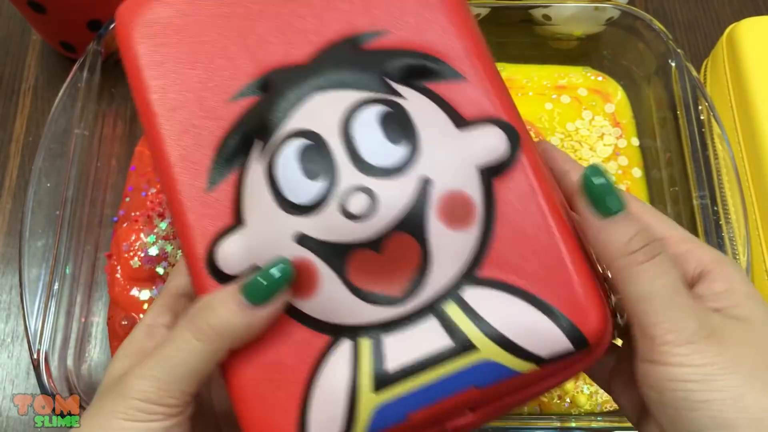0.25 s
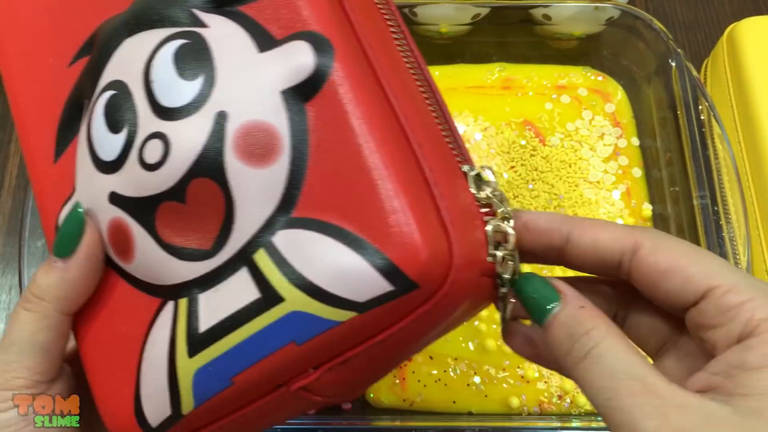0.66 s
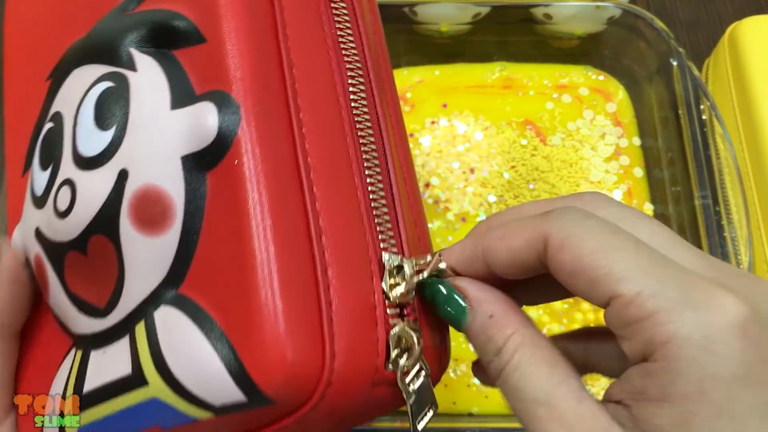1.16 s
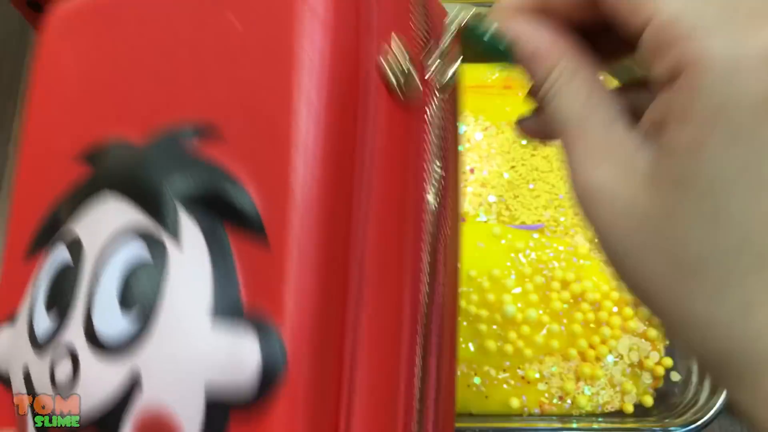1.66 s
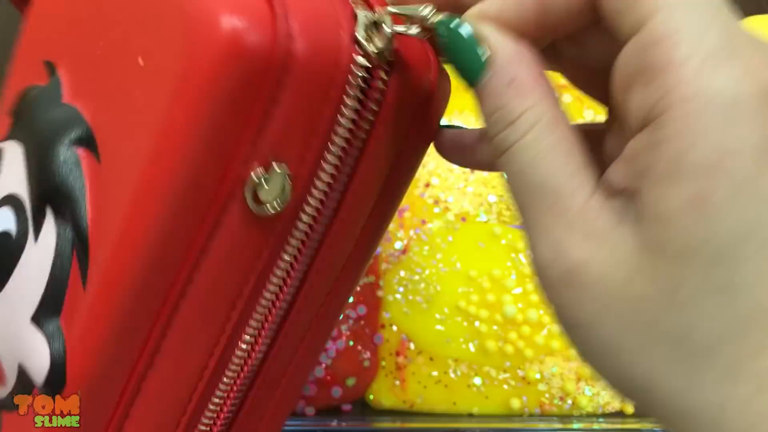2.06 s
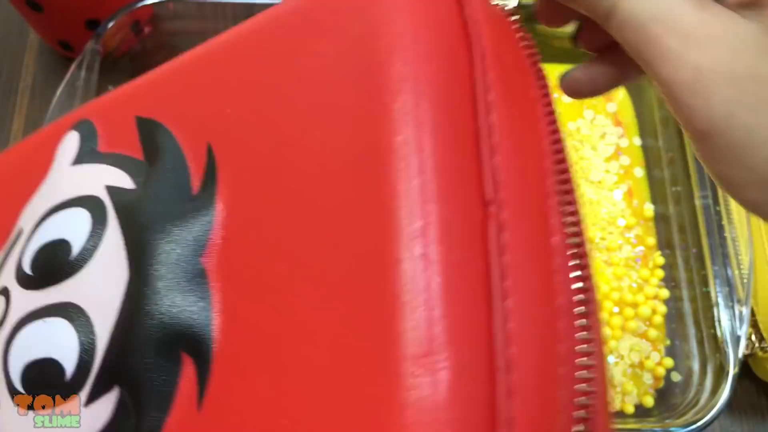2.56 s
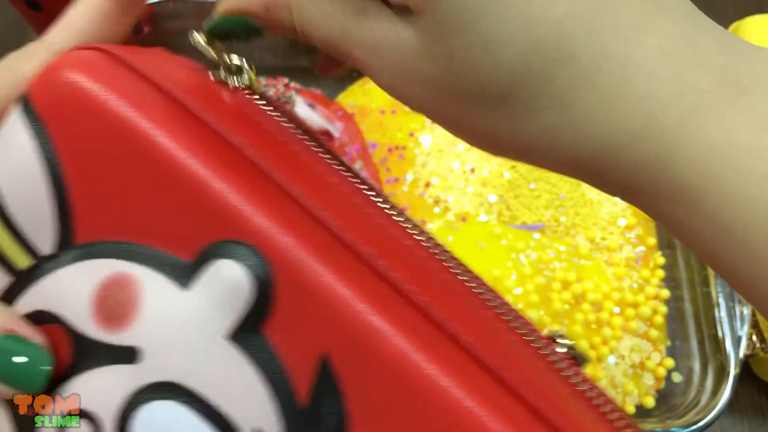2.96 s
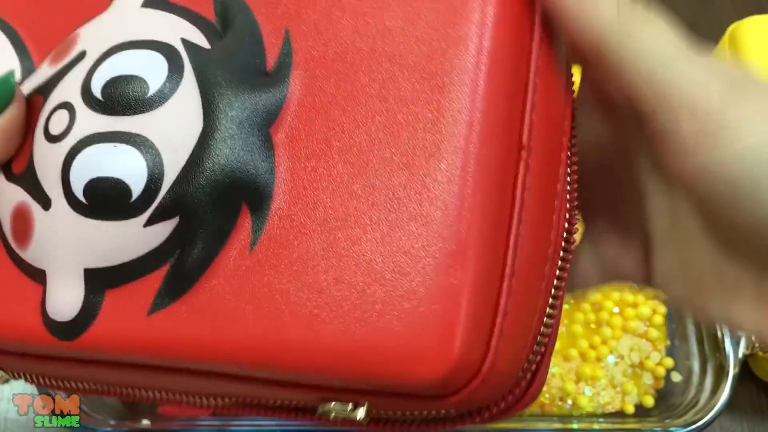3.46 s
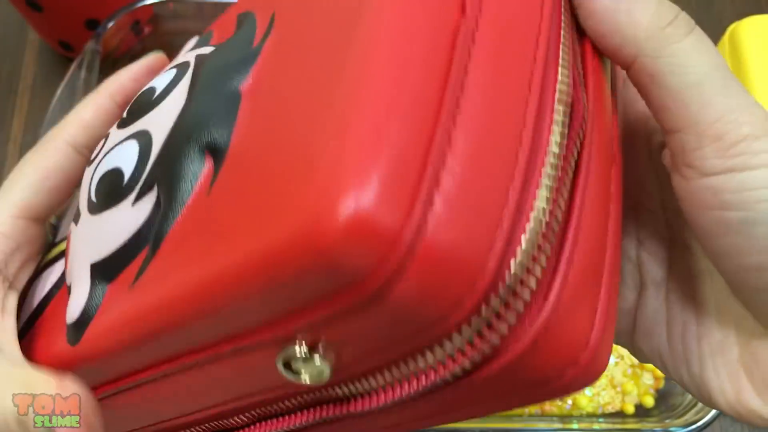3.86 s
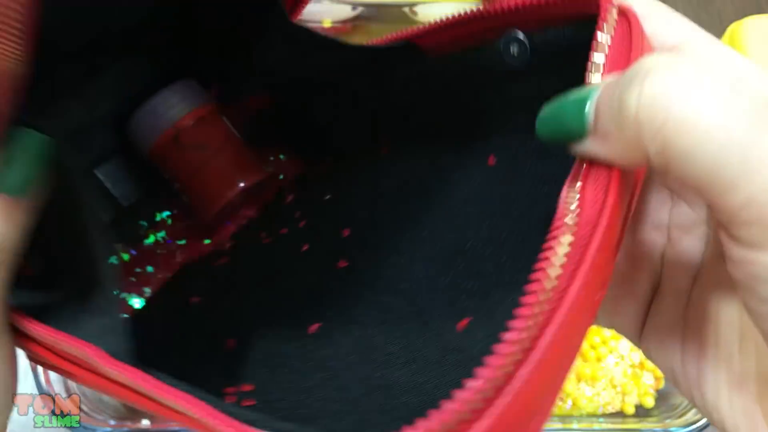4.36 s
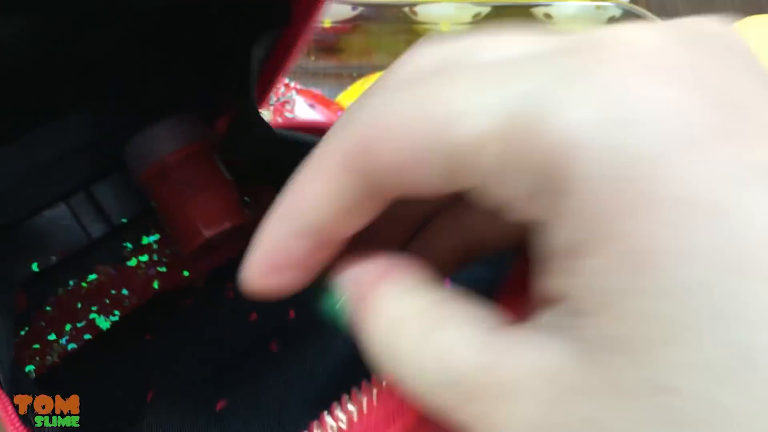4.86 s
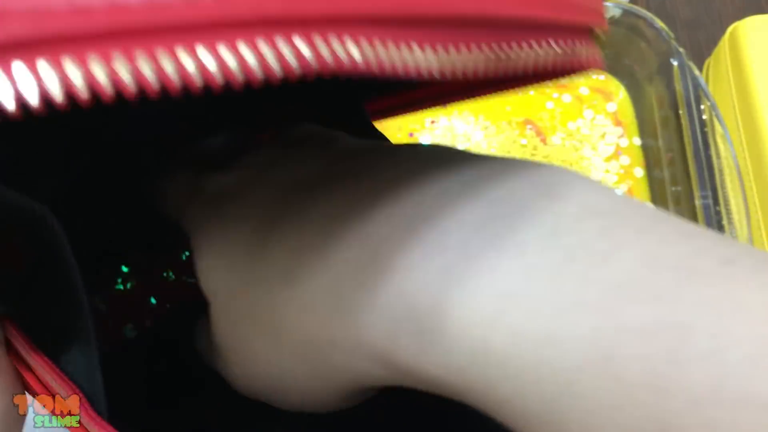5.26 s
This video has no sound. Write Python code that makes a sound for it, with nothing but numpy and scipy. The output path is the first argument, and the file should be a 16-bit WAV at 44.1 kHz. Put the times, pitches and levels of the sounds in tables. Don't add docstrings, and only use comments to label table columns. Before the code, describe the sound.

Metal zip pulls jingle on a stiff case, the zip is drawn open in quick buzzing runs, then the lid pops and fingers rub inside.

```python
import sys
import numpy as np
from scipy import signal
from scipy.io import wavfile
from scipy.ndimage import uniform_filter1d

SR = 44100
rng = np.random.default_rng(int(sys.argv[2]) if len(sys.argv) > 2 else 0)


def volts_from_decibels(level):
    exponent = np.asarray(level, float) / 20
    return 10 ** exponent


def transcribe(u):
    v = np.clip(np.atleast_2d(u).T, -1, 1)
    q = np.round(v * 32767).astype(np.int16)
    wavfile.write(sys.argv[1], SR, q)


N = 243431

# frequency in Hz, level in dB per Hz.
ROOM_COLOUR = [(15, -41), (25, -10), (107, 2), (253, -12.5), (331, -7.5), (782, -23.5), (2360, -23),
               (2920, -32.5), (3440, -27), (15500, -33.5)]
ROOM_DB = -59.5

# start in seconds, length in seconds, pressure in dB,
# slide against pressure in dB.
STROKES = [(0.225, 0.075, -65.5, -21), (0.448, 0.15, -60, -4), (0.647, 0.078, -57.5, -8.5),
           (0.87, 0.22, -59, -9), (1.213, 0.062, -53.5, -10.5), (1.333, 0.19, -54, -6.5),
           (1.561, 0.13, -54, -18), (1.703, 0.2, -51.5, -11.5), (2.024, 0.082, -41.5, -13.5),
           (2.118, 0.15, -46.5, -10), (2.374, 0.053, -47.5, -5.5), (2.524, 0.068, -44.5, -13),
           (2.884, 0.15, -40, -15.5), (3.298, 0.11, -45, -7.5), (3.38, 0.061, -41.5, -10),
           (3.502, 0.11, -56.5, -4), (3.643, 0.15, -48, -5), (3.744, 0.11, -47, -6.5),
           (3.886, 0.13, -49.5, -0.5), (3.979, 0.13, -45, -4), (4.045, .16, -44, -10),
           (4.207, 0.38, -56.5, -5), (4.406, 0.069, -45, -4.5), (4.542, 0.095, -52.5, 1.5),
           (4.632, 0.13, -55, 4), (4.75, 0.052, -57, 1), (4.806, 0.055, -60, 4.5),
           (4.95, 0.079, -59.5, 2.5), (5.036, 0.032, -53, -7.5), (5.14, 0.18, -53.5, 4.5),
           (5.268, 0.17, -48.5, 2.5)]
TOUCH_S, LET_GO_DB_PER_S, REST_DB = 0.026, 225, -78
LINGER_DB, LINGER_DB_PER_S = -7, 25
CREAK_SHUT_DB, CREAK_OPEN_DB, CREAK_FOLLOWS_SLIDE = -1.5, -1, 0.4
RUMBLE_DB, RUMBLE_FOLLOWS, ARM_S = -35.5, 0.43, 0.044
# frequency in Hz, level in dB per Hz.
SHUT_COLOUR = [(88, -33), (150, -11.5), (339, -3), (710, -13.5), (1300, -19.5), (2990, -30), (11400, -38),
               (13400, -33), (15600, -44)]
# frequency in Hz, level in dB per Hz.
OPEN_COLOUR = [(88, -30), (150, 7.5), (398, 4.5), (689, 1), (1100, -2.5), (1390, -25), (3220, -13),
               (14200, -15.5), (16000, -23)]
OPENS_AT_S, AIR_DB = 3.55, -1
# frequency in Hz, width in Hz, level in dB.
HOLLOW_MODES = [(700, 200, -1), (1490, 300, 1), (2300, 400, -5)]
# frequency in Hz, width in Hz, level in dB.
REACHED_MODES = [(170, 74, -3), (698, 51, 1.5), (1460, 170, 3.5), (2540, 950, 0.5)]
REACH_S = 5.03
REACH_DB, REACH_DAMPS_DB = 8.0, -1.5
# frequency in Hz, width in Hz, level in dB.
HAND_GAP_MODES = [(2750, 1000, 0)]
HAND_GAP_DB = -20

# start in seconds, end in seconds, level in dB.
FOLD_CREAKS = [
    (3.77, 3.888, -48),
    (3.906, 3.95, -43),
    (4.444, 4.495, -42.5),
    (4.622, 4.79, -49.5),
]
# frequency in Hz, width in Hz, level in dB.
FOLD_MODES = [(1380, 260, 0), (2230, 120, 0), (3960, 540, -16)]

# time in seconds, peak in dB, frequency in Hz.
BUMPS = [(.581, -43, 380), (.67, -42.5, 546), (.7006, -38, 460), (.902, -40, 466), (.93, -36.5, 345),
         (.979, -40, 444), (1.014, -42, 445), (1.066, -40.5, 326), (1.1926, -33, 398), (1.262, -37, 373),
         (1.407, -34, 466), (1.454, -38.5, 328), (1.591, -36, 506), (1.625, -36.5, 505), (2.164, -33, 324),
         (2.189, -25, 380), (2.233, -36.5, 180), (2.269, -42.5, 380), (2.347, -28.5, 413),
         (2.404, -32.5, 435), (2.422, -30.5, 357), (2.521, -36, 370), (2.6, -31, 437), (2.86, -24, 506),
         (2.925, -28, 446), (3.102, -27.5, 520), (3.413, -30, 363), (3.5715, -40, 425.4), (2.701, -34, 390),
         (2.715, -25.5, 390), (2.04, -18.5, 487), (2.052, -21.5, 366)]
# time in seconds, peak in dB, frequency in Hz.
LID_POP = [(4.047, -37, 473), (4.0832, -8.5, 575), (4.086, -16.5, 345), (4.098, -24.5, 195),
           (4.109, -27, 204), (4.113, -18.5, 540), (4.131, -30, 680), (4.142, -34, 625), (4.15, -29.5, 322),
           (4.158, -38, 623), (4.165, -28, 306), (4.1785, -21.5, 515), (4.19, -38, 670), (4.203, -35, 307),
           (4.218, -38, 620), (4.225, -40.5, 342), (4.24, -44, 624), (4.258, -38, 340)]
# time in seconds, peak in dB.
RIM_TAPS = [(0.568, -36.5), (0.727, -40), (0.964, -32.5), (1.223, -44), (1.568, -42), (2.216, -32),
            (3.07, -30.5), (3.782, -25), (3.811, -28.5), (3.829, -28), (3.852, -39), (3.869, -26),
            (3.908, -31), (3.937, -29.5), (4.738, -30.5), (4.768, -31.5), (5.447, -38), (3.77, -32),
            (4.046, -30.5), (4.086, -33), (4.096, -27), (4.1125, -22.5), (4.1813, -31.5), (4.294, -41),
            (5.114, -40), (5.168, -36), (5.241, -46), (5.261, -36), (5.29, -35), (5.332, -28), (5.379, -34),
            (5.51, -34)]
# time in seconds, peak in dB.
GAPE_BUMPS = [(2.634, -35), (3.395, -34), (3.6361, -20), (3.659, -36), (3.696, -21), (3.706, -25.5),
              (3.964, -31.5), (4.447, -33), (4.459, -33), (4.478, -31.5), (4.4971, -32), (4.533, -35),
              (4.633, -36.5), (4.647, -30), (4.714, -33.5), (5.02, -27.5), (5.206, -37.5), (5.31, -34),
              (5.511, -33.5)]
RIM_HZ, GAPE_HZ = 1318, 649
# time in seconds, peak in dB, frequency in Hz.
JOLTS = [(2.59, -38, 155), (2.851, -26.5, 185), (2.245, -38.5, 87.5), (2.811, -37, 104.1), (3.001, -45, 70),
         (4.4, -47, 70), (5.286, -36, 170), (5.431, -42, 60)]

# time in seconds, tick peak in dB, knock peak in dB.
SMALL_PULL = [(.5664, -32.5, -36), (.7, -35.5, -41.5), (.7227, -26.5, -42), (.899, -32.5, -38),
              (.9287, -26.5, -32), (1.2256, -35, -42), (1.248, -25.5, -31.5), (1.268, -32, -38),
              (1.362, -29, -39.5), (1.4042, -30, -25.5), (1.735, -28.5, -48), (2.16, -34, -32.5),
              (2.526, -36, -43), (2.5425, -41, -53), (2.56, -23, -32), (2.567, -27, -28.5),
              (2.5824, -40.5, -33), (2.6027, -19, -23.5), (2.903, -34.5, -43), (3.78, -37, -25),
              (3.85, -40, -28), (4.092, -26.5, -27), (4.4674, -31, -46), (4.4765, -22.5, -33),
              (4.532, -28, -25.5), (4.635, -34, -40), (4.771, -37, -35), (5.1776, -33, -30),
              (5.423, -43, -39), (5.45, -47, -30), (.574, -40, -38), (.668, -51, -45), (.905, -50, -54),
              (.95, -46, -66), (2.554, -42, -32), (3.611, -36, -37)]
# time in seconds, tick peak in dB, knock peak in dB.
LARGE_PULL = [(.307, -48, -46.5), (.964, -43, -31), (1.021, -44, -45), (1.1936, -24, -33), (1.23, -37, -40),
              (1.397, -26, -53.5), (1.4465, -21.5, -29), (1.4522, -25, -26), (1.49, -33, -56),
              (1.507, -34, -35), (1.566, -37, -36), (2.2148, -24, -39), (2.2308, -26.5, -25),
              (2.407, -39, -31), (3.067, -37, -32), (3.396, -30, -25), (3.4037, -33, -34),
              (3.443, -44, -34), (3.626, -41, -34), (3.6363, -16, -15.5), (3.659, -28, -30),
              (3.6707, -21.5, -23), (3.678, -27, -29), (3.7056, -20, -20), (3.911, -36, -41),
              (3.966, -34, -31.5), (4.672, -41, -30), (5.02, -40, -29.5), (1.393, -35, -46),
              (2.513, -51, -43), (2.594, -34, -28.5), (3.696, -40, -39)]
# time in seconds, tick peak in
# dB, knock peak in dB.
NAILS = [(.976, -34, -34), (1.008, -35, -56), (1.588, -29, -29.5), (1.623, -28, -30.5), (1.787, -37, -44),
         (2.598, -40, -33), (3.1016, -53, -26.5), (3.572, -40, -33), (3.81, -33, -31.5),
         (3.816, -43, -24.5), (3.831, -43, -34), (3.868, -36, -30), (3.946, -33.5, -35), (4.0777, -30, -24),
         (4.0835, -40.5, -22), (4.113, -44, -23), (4.164, -36, -32), (4.179, -49, -31.5),
         (4.4456, -44, -41), (4.495, -51, -29.5), (4.736, -51, -24.5), (4.779, -47.5, -29.5),
         (4.867, -46, -33), (5.026, -38.5, -35), (2.788, -31, -22), (2.796, -41, -24), (2.826, -24, -14),
         (2.831, -40, -22), (3.999, -44, -51), (4.027, -47, -48), (4.146, -37, -44), (4.455, -44, -38),
         (4.487, -48, -42), (4.714, -48, -36), (4.846, -50, -37), (5.148, -56, -35), (2.588, -49, -38),
         (3.803, -46, -30), (3.878, -42, -35), (3.927, -51, -37), (4.01, -48, -55)]
SMALL_HZ, LARGE_HZ, NAIL_HZ = 13200, 10200, 6100
HZ_SPREAD = 0.03
BOUNCE_S, BOUNCE_DB = 0.005, -14

# time in seconds, level in dB, frequency in Hz,
# time to fall 60 dB in seconds.
PULL_RINGS = [(.942, -41, 10430, 0.036), (1.229, -33, 10400, 0.015), (2.602, -24.5, 9530, 0.0092),
              (3.638, -29, 10600, 0.025), (3.639, -48, 9400, .2), (3.639, -49, 13800, .1),
              (3.708, -52, 10600, .12), (3.708, -48, 13300, .12), (3.706, -29.5, 9450, 0.055),
              (3.706, -49, 9450, .6), (.929, -46, 10300, .03), (1.1936, -21, 14000, 0.0091),
              (1.361, -32.5, 9900, 0.013), (1.446, -37, 12800, .012), (1.4522, -33, 12800, .012),
              (2.56, -27, 13500, 0.011), (2.567, -26, 14200, .008), (2.602, -12, 13530, 0.008),
              (2.603, -33, 12200, 0.01), (3.678, -24, 11700, .009), (3.7056, -26, 13800, .012)]
BEAT_HZ, BEAT_DEPTH = 37.8, 0.29
# time in seconds, peak in dB.
SHIMMERS = [
    (2.603, -47),
    (3.706, -36),
]
SHIMMER_T60_S = 0.35

# time in seconds, teeth per second, pull force in dB,
# how firmly the slider bears on the wall in dB, answer of the panel at twice the tooth rate in dB.
RUNS = [
    [(1.8, 66, -52.5, -6, -14), (1.84, 148, -37.5, 0, -18), (1.876, 200, -33, 3.5, 8.5),
     (1.92, 231, -28.5, 2.5, -6), (1.945, 282, -26.5, 8, -1.5), (1.97, 322, -27.5, 14, -24),
     (2.003, 332, -24, -21, -22), (2.036, 350, -33, 2, -9), (2.07, 281, -46, 2, 0)],
    [(2.7, 62, -44.5, -13, -9), (2.732, 126, -38.5, 7, -3), (2.747, 190, -34.5, 9.5, -4),
     (2.76, 324, -35, 10, 2), (2.79, 390, -25, -1, -11), (2.812, 490, -27.5, 5.5, -23),
     (2.832, 570, -27, -0.5, -20), (2.87, 490, -53, 11, -10)],
    [(2.925, 100, -51, -15, -5), (2.965, 125, -40.5, -12, 2), (3.0, 206, -48.5, 20, 0),
     (3.03, 182.5, -66, 20, 0)],
    [(3.1, 170, -47, 7, -1), (3.14, 200, -39, 9, 0), (3.155, 213, -36, 12.5, 7),
     (3.186, 285, -32, 3.5, 3.5), (3.215, 305, -25.5, 1, -19), (3.24, 317, -25, -7, 7.5),
     (3.262, 288, -25.5, -14, -7), (3.292, 215, -30, -4, 0.5), (3.33, 197, -45.5, -2, -1)],
]
# frequency in Hz, level in dB per Hz.
ZIP_COLOUR = [(380, -34), (650, 0), (784, -15), (1290, -13), (2500, -16), (3100, -31.5), (3700, -14.5),
              (6180, -22), (16000, -30)]
# frequency in Hz, width in Hz, level in dB.
WALL_MODES = [
    [(1052, 44, -2), (1276, 54, 3), (1763, 52, -3.5), (2100, 590, 3)],
    [(950, 90, 1), (1410, 140, 7.5), (1880, 191, -5), (2344, 190, 6.5)],
    [(900, 220, -9), (1260, 110, 4), (1810, 200, -7), (2240, 690, 5)],
    [(847, 150, 4), (1295, 100, 6.5), (1777, 60, -1), (2330, 1200, 0.5)],
]
# frequency in Hz, width in Hz, level in dB.
SLIDER_MODES = [
    [(3590, 240, -3.5), (4550, 220, -3), (5050, 200, -20), (6620, 360, 7), (7800, 3200, 3)],
    [(3530, 360, -4.5), (4300, 450, 5), (4840, 500, -29), (6450, 680, -5), (8000, 3500, 1)],
    [(3640, 640, -5), (4700, 300, 1), (5160, 600, -17), (6100, 610, 10), (7950, 6600, 2)],
    [(3830, 320, 2), (4050, 230, 3), (5020, 57, 0), (6400, 310, 7), (7900, 8400, -4)],
]
# frequency in Hz, width in Hz, level in dB.
BOX_MODES = [(380, 86, -1), (537, 170, -3.5)]
BOX_FADES_DB_PER_S = 6.5
SIZZLE_DB, SIZZLE_GROWS, FULL_FORCE_DB = -3, 0.23, -22.5
RUN_KNOCK_DB = [0.11, 0.36, 0.1, 2.7]
RUN_SIZZLE_DB = [-0.98, -1.5, -1.2, -1.16]
OTHER_ROW_DB = [-1.5, -2.0, -3.0, -2.0]
OTHER_ROW_LAG, TOOTH_SCATTER = 0.46, 0.09
SKIPS_DB_PER_OCT = 16
BRISK_PER_S = 200


def rms_one(x):
    return x / np.sqrt(np.mean(x ** 2) + 1e-20)


def peak_one(x):
    return x / np.max(np.abs(x))


def band(x, low_hz, high_hz):
    return signal.sosfilt(signal.butter(2, [low_hz, high_hz], "band", fs=SR, output="sos"), x)


def drift(rate_hz):
    r = np.exp(-80 * np.pi * rate_hz / SR)
    chance = rng.standard_normal(N // 40 + 2002)
    slow = rms_one(signal.lfilter([1], [1, -2 * r, r * r], chance)[2000:])
    return np.interp(np.arange(N) / 40, np.arange(len(slow)), slow)


def coloured(x, spectrum, low_hz, high_hz, patchy_db):
    hz, db = np.transpose(spectrum)
    edges = np.geomspace(low_hz, high_hz, 2 + int(3 * np.log2(high_hz / low_hz)))
    middles = np.log(edges[1:] * edges[:-1]) / 2
    levels = np.interp(middles, np.log(hz), db)
    out = 0
    for k, (low, high, level) in enumerate(zip(edges, edges[1:], levels)):
        flicker = volts_from_decibels(level + patchy_db * drift(22.0))
        out = out + (-1) ** k * flicker * band(x, low, high)
    return rms_one(out)


def resonate(x, modes):
    out = 0
    for k, (hz, width_hz, db) in enumerate(modes):
        r = np.exp(-np.pi * width_hz / SR)
        poles = [1, -2 * r * np.cos(2 * np.pi * hz / SR), r * r]
        out = out + (-1) ** k * volts_from_decibels(db) * rms_one(signal.lfilter([1, 0, -1], poles, x))
    return rms_one(out)


def grains(per_s, spread_db):
    sizes = volts_from_decibels(spread_db * np.minimum(rng.exponential(1, N), 5)) * rng.choice([-1, 1], N)
    return rms_one(sizes * (rng.random(N) < per_s / SR))


def dying(t, rise_s, t60):
    return volts_from_decibels(-60 * t / t60) * (1 - np.exp(-t / rise_s))


def add(out, s, sound):
    at = round(s * SR)
    out[at:at + len(sound)] += sound[:N - at]


def in_time(tables, fade_s):
    t = np.arange(N) / SR
    s, *columns = np.transpose(np.vstack(tables))
    gate = 0
    for rows in tables:
        start, end = rows[0][0], rows[-1][0]
        gate = gate + np.interp(t, [start - fade_s, start, end, end + fade_s], [0, 1, 1, 0])
    return [np.minimum(gate, 1)] + [np.interp(t, s, c) for c in columns]


def per_run(values):
    starts = [run[0][0] - 0.02 for run in RUNS[1:]]
    return np.choose(np.searchsorted(starts, np.arange(N) / SR), values)


def room_air():
    return volts_from_decibels(ROOM_DB) * coloured(rng.standard_normal(N), ROOM_COLOUR, 36, 17500, patchy_db=1.2)


def room_tail(x, t60, wet_db):
    t = np.arange(12000) / SR
    echo = band(rng.standard_normal(len(t)), 140, 11400) * volts_from_decibels(-60 * t / t60) * (t > 0.003)
    return volts_from_decibels(wet_db) * signal.fftconvolve(x, echo / np.sqrt(np.sum(echo ** 2)))[:N]


def steady_top(x):
    return signal.sosfilt(signal.ellip(10, 0.5, 60, 15850, fs=SR, output="sos"), x)


def stroke_levels(opened):
    t = np.arange(N) / SR
    press = slide = volts_from_decibels(REST_DB)
    for s, length_s, db, slide_db in STROKES:
        after = np.maximum(t - s - length_s, 0)
        fall_db = np.minimum(LET_GO_DB_PER_S * after, LINGER_DB_PER_S * after - LINGER_DB)
        shape = np.clip((t - s) / TOUCH_S, 0, 1) * volts_from_decibels(db - fall_db)
        press = np.maximum(press, shape)
        slide = np.maximum(slide, shape * volts_from_decibels(slide_db))
    wall_db, hiss_db = 20 * np.log10(press), 20 * np.log10(slide)
    creak_db = wall_db + CREAK_FOLLOWS_SLIDE * (hiss_db - wall_db)
    creak_db = creak_db + (1 - opened) * CREAK_SHUT_DB + opened * CREAK_OPEN_DB
    gate, per_s, force_db, *_ = in_time(RUNS, fade_s=0.01)
    pull_db = np.where(gate > 0, force_db - 32.0, REST_DB)
    effort_db = uniform_filter1d(np.maximum(wall_db, pull_db), int(ARM_S * SR))
    return RUMBLE_DB + RUMBLE_FOLLOWS * effort_db, wall_db, creak_db, hiss_db


def hands():
    hiss = rng.standard_normal(N) + 0.36 * grains(900, spread_db=3.0)
    crackle = grains(420 * volts_from_decibels(5.0 * drift(12)), spread_db=3.2)
    opened = np.clip((np.arange(N) / SR - OPENS_AT_S) / 0.043, 0, 1)
    rumble_db, wall_db, creak_db, hiss_db = stroke_levels(opened)
    reached = np.arange(N) > REACH_S * SR

    rubbing = hiss + (0.68 - 0.34 * reached) * crackle
    with_hand, without_hand = (resonate(resonate(rubbing, m), m) for m in (REACHED_MODES, HOLLOW_MODES))
    air = np.where(reached, with_hand, without_hand)
    air = air + reached * volts_from_decibels(HAND_GAP_DB) * resonate(hiss + 0.44 * crackle, HAND_GAP_MODES)

    shake = band(band(rng.standard_normal(N), 32, 133), 34, 440)
    rumble = volts_from_decibels(rumble_db) * rms_one(shake * volts_from_decibels(1.5 * drift(9.7)))

    shaped = volts_from_decibels(creak_db + AIR_DB + REACH_DB * reached) * opened * air
    damped = 0.83 * volts_from_decibels(REACH_DAMPS_DB * reached)
    # level, band edges in Hz, flicker in dB, share of crackle, share left when open
    parts = [(wall_db, 150, 900, 2.4, 0.45, 0.9),
             (creak_db, 900, 3000, 1.8, 0.95, damped),
             (hiss_db, 3000, 16500, 1.1, 0.45, 0.95)]
    for db, low, high, patchy_db, rough, bare in parts:
        drag = hiss + rough * crackle
        shut = coloured(drag, SHUT_COLOUR, low, high, patchy_db)
        hollow = coloured(drag, OPEN_COLOUR, low, high, patchy_db)
        shaped = shaped + volts_from_decibels(db + 0.5) * ((1 - opened) * shut + opened * bare * hollow)
    return rumble + shaped * volts_from_decibels(2.1 * drift(34.0))


def fold():
    t = np.arange(N) / SR
    bend = 0
    for start, end, db in FOLD_CREAKS:
        times = [start - 0.004, start, end, end + 0.012]
        bend = bend + volts_from_decibels(db) * np.interp(t, times, [0.00072, 0.66, 0.53, 0.0084])
    slips = grains(700 * volts_from_decibels(4.0 * drift(30)), spread_db=3.5)
    return bend * resonate(slips + 0.46 * rng.standard_normal(N), FOLD_MODES)


def knocks():
    out, t = np.zeros(N), np.arange(6000) / SR
    rim = [(s, db, RIM_HZ) for s, db in RIM_TAPS]
    gape = [(s, db, GAPE_HZ) for s, db in GAPE_BUMPS]
    rows = BUMPS + LID_POP + rim + gape + JOLTS
    draws = zip(rng.random((len(rows), 2)), rng.standard_normal((len(rows), len(t))))
    for (s, db, hz), ((ratio, phase), chance) in zip(rows, draws):
        second_hz = (0.701 + 0.814 * ratio) * hz
        modes = np.sin(2 * np.pi * hz * t) + 0.5 * np.sin(2 * np.pi * (second_hz * t + phase))
        hit = peak_one(modes * dying(t, rise_s=0.4 / hz, t60=0.006 + 9.9 / hz))
        shake = band(chance, 0.13 * hz, 1.27 * hz) * dying(t, rise_s=0.0061, t60=0.032 + 7.7 / hz)
        add(out, s, volts_from_decibels(db) * (hit + 0.27 * peak_one(shake)))
    return out


def contacts():
    rows = []
    for table, hz, hangs in [(SMALL_PULL, SMALL_HZ, True), (LARGE_PULL, LARGE_HZ, True), (NAILS, NAIL_HZ, False)]:
        chances = rng.uniform(-1, 1, (len(table), 3))
        for (s, tick_db, knock_db), (tune, lag, loss) in zip(table, chances):
            rows.append((s, tick_db, hz * (1 + HZ_SPREAD * tune), knock_db))
            if hangs:
                drop_db = BOUNCE_DB + 3.9 * loss
                again_s = s + BOUNCE_S * (1 + 0.37 * lag)
                rows.append((again_s, tick_db + drop_db, hz, knock_db + drop_db))
    return rows


def jingles():
    out, t = np.zeros(N), np.arange(1500) / SR
    rows = contacts()
    chances = rng.standard_normal((len(rows), len(t)))
    for (s, tick_db, tick_hz, knock_db), chance in zip(rows, chances):
        tick = band(chance, tick_hz ** 2 / 19000, 15500) + 1.7 * band(chance, 0.95 * tick_hz, 1.08 * tick_hz)
        tick = tick * dying(t, rise_s=0.00027, t60=0.0076)
        knock = band(band(chance[::-1], 260, 2200), 280, 8600) * dying(t, rise_s=0.00015, t60=0.014)
        add(out, s, volts_from_decibels(tick_db) * peak_one(tick) + volts_from_decibels(knock_db) * peak_one(knock))
    return out


def rings():
    out, t = np.zeros(N), np.arange(6000) / SR
    long = np.arange(12000) / SR
    beat = 1 + BEAT_DEPTH * np.cos(2 * np.pi * BEAT_HZ * long)
    for s, db, hz, t60 in PULL_RINGS:
        ring = np.sin(2 * np.pi * hz * long) * dying(long, rise_s=0.00038, t60=t60)
        add(out, s, volts_from_decibels(db) * beat * ring)
    for s, db in SHIMMERS:
        rattle = band(rng.standard_normal(len(t)), 0.97 * SMALL_HZ, 1.08 * SMALL_HZ)
        add(out, s, volts_from_decibels(db) * peak_one(rattle * dying(t, rise_s=0.00202, t60=SHIMMER_T60_S)))
    return out


def tooth_levels(force_db, bearing_db, panel_db):
    sizzle_db = force_db + SIZZLE_DB + SIZZLE_GROWS * (force_db - FULL_FORCE_DB)
    return force_db + bearing_db, force_db + panel_db, force_db, sizzle_db


def row_of_teeth(teeth, lag, luck):
    tooth = teeth.astype(int)
    late = TOOTH_SCATTER * (1 + np.tanh(luck[::-1][tooth])) / 2
    since = teeth % 1 - lag - late
    return volts_from_decibels(1.7 * luck[tooth]), since % 1


def zip_runs():
    gate, per_s, force_db, bearing_db, panel_db = in_time(RUNS, fade_s=0.0083)
    tone_db, second_db, knock_db, sizzle_db = tooth_levels(force_db, bearing_db, panel_db)

    teeth = np.cumsum(per_s * (1 + 0.04 * drift(260))) / SR
    luck = rng.standard_normal(int(teeth[-1]) + 1)
    strength, since = row_of_teeth(teeth, 0, luck)
    other, other_since = row_of_teeth(teeth, OTHER_ROW_LAG, np.roll(luck, 7))
    skips_db = SKIPS_DB_PER_OCT * np.log2(np.maximum(per_s / BRISK_PER_S, 1))
    other = other * volts_from_decibels(per_run(OTHER_ROW_DB) - skips_db)

    size = np.sqrt(SR / np.maximum(per_s, BRISK_PER_S))
    clicks = size * strength * (np.diff(since, prepend=0) < -0.6) + 1e-18
    both = clicks + size * other * (np.diff(other_since, prepend=0) < -0.6)
    scrape = 0.4 + strength * np.exp(-8 * since) + other * np.exp(-8 * other_since)
    burst = rms_one(scrape * rng.standard_normal(N))

    tone = volts_from_decibels(tone_db + 3.6 * drift(120)) * np.sin(2 * np.pi * teeth + 1.6)
    second = volts_from_decibels(second_db + 3.8 * drift(70)) * np.sin(4 * np.pi * teeth + 1.2)
    box_fade_db = BOX_FADES_DB_PER_S * (np.arange(N) / SR - RUNS[0][0][0])
    box = volts_from_decibels(knock_db - 2.0 - box_fade_db) * resonate(burst, BOX_MODES)

    knock = 0.75 * per_run([resonate(clicks, modes) for modes in WALL_MODES])
    knock = knock + 0.55 * rms_one(band(both, 700, 3300))
    knock = knock + 0.55 * coloured(burst, ZIP_COLOUR, 642, 3150, patchy_db=1.5)
    sizzle = 0.6 * per_run([resonate(both, modes) for modes in SLIDER_MODES])
    sizzle = sizzle + 1.15 * rms_one(band(both, 1700, 9000))
    sizzle = sizzle + 0.94 * coloured(burst, ZIP_COLOUR, 2910, 18400, patchy_db=-0.5)

    knock = volts_from_decibels(knock_db + per_run(RUN_KNOCK_DB)) * knock
    sizzle = volts_from_decibels(sizzle_db + per_run(RUN_SIZZLE_DB)) * sizzle
    return gate * (1.16 * (tone + second) + box + knock + sizzle)


def scene():
    slider, strikes, ringing = zip_runs(), jingles(), rings()
    strikes = strikes + knocks()
    room = room_air()
    tail = room_tail(slider + strikes + 0.33 * ringing, t60=0.42, wet_db=-14.5)
    steady = steady_top(slider + tail + hands() + fold() + room)
    return (strikes + ringing + steady)[None]


def low_pass(x):
    return signal.sosfilt(signal.butter(12, 16990, fs=SR, output="sos"), x)


def record(dry):
    no_rumble = signal.lfilter([1, -1], [1, -0.995], dry)
    no_rumble = signal.sosfilt(signal.butter(2, 38, "high", fs=SR, output="sos"), no_rumble)
    mix = signal.sosfilt(signal.ellip(10, 0.5, 70, 16750, fs=SR, output="sos"), no_rumble)
    return low_pass(mix)


dry = scene()
out = record(dry)
transcribe(out)
```